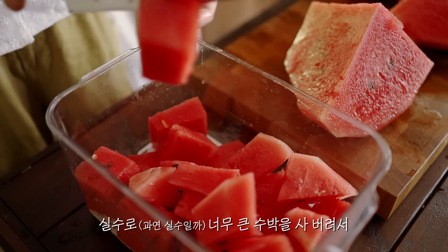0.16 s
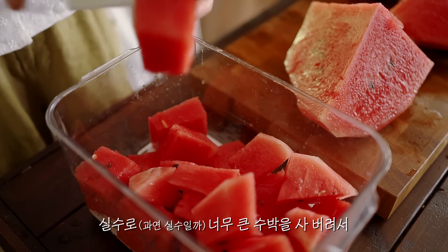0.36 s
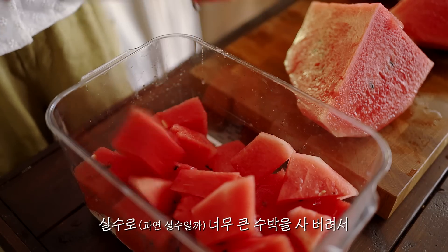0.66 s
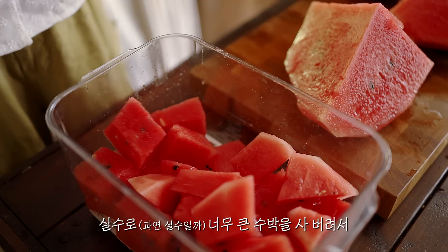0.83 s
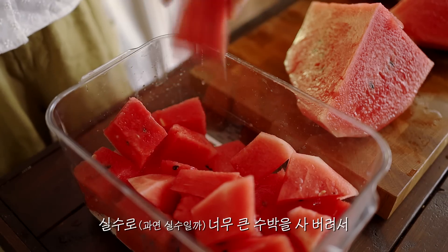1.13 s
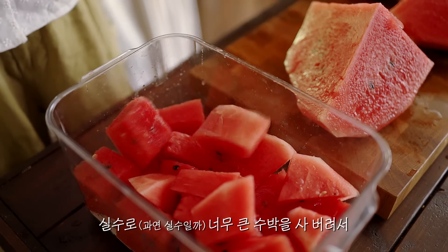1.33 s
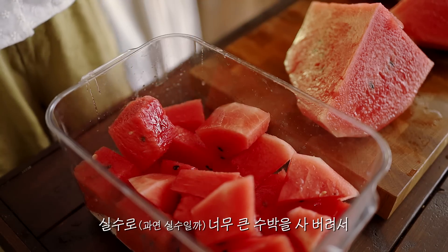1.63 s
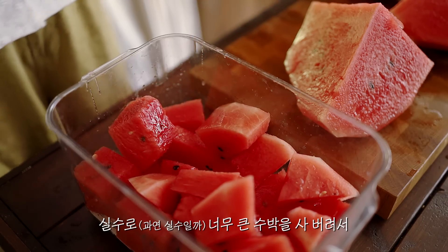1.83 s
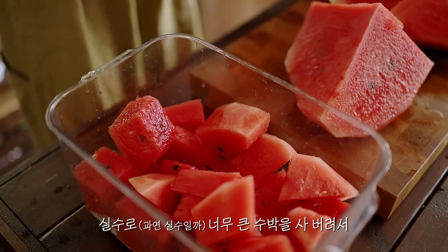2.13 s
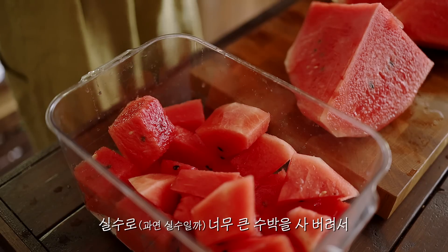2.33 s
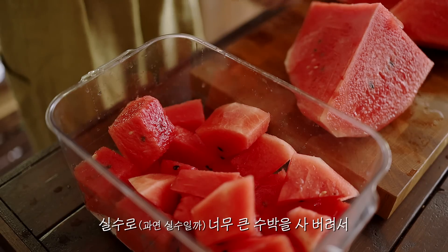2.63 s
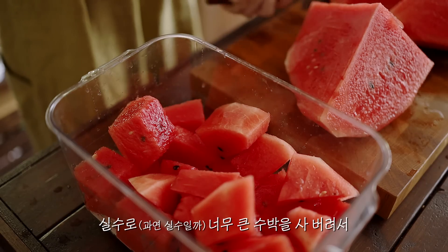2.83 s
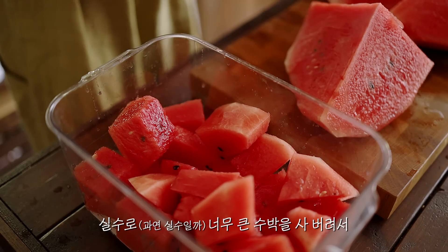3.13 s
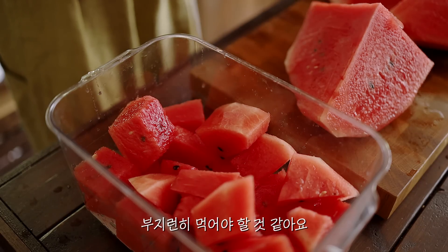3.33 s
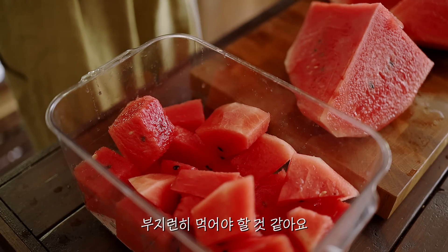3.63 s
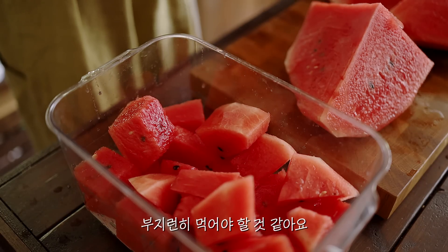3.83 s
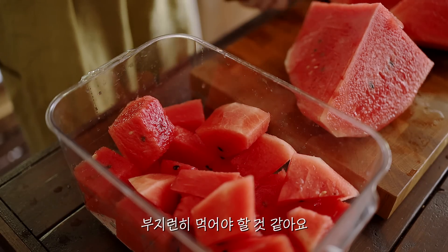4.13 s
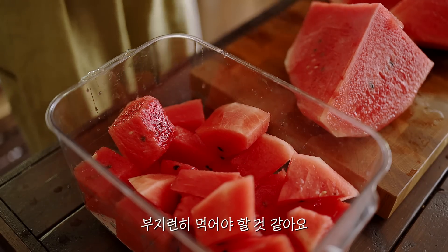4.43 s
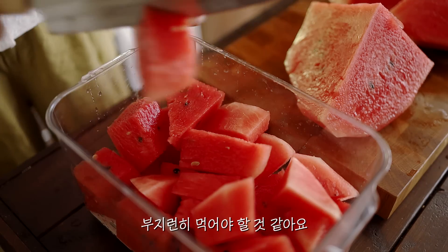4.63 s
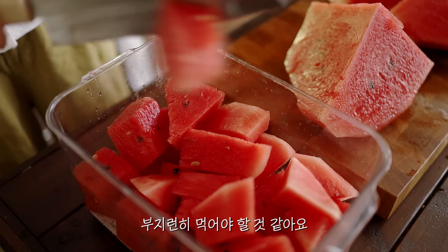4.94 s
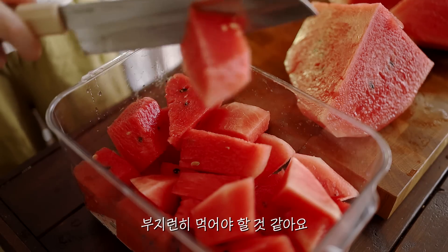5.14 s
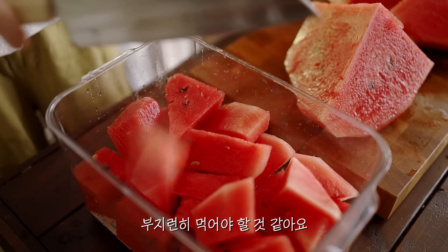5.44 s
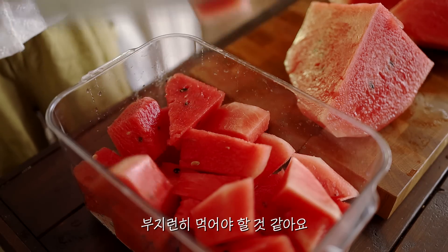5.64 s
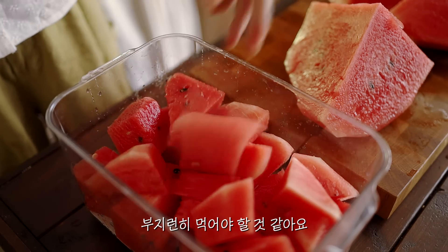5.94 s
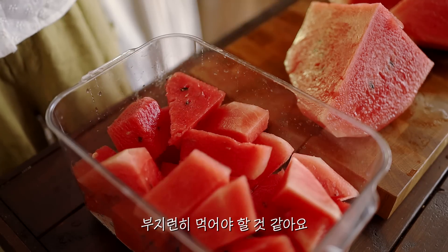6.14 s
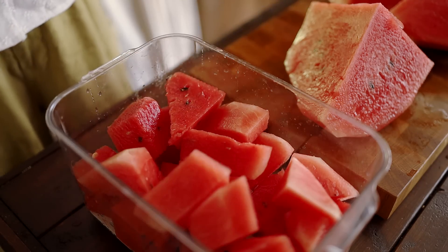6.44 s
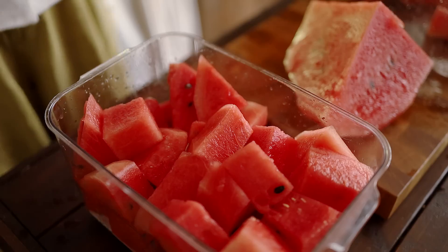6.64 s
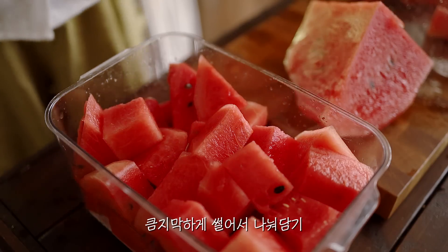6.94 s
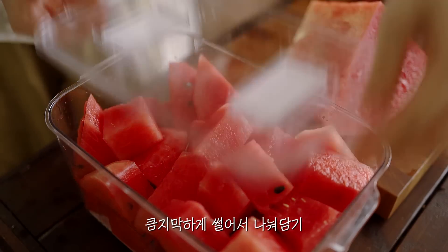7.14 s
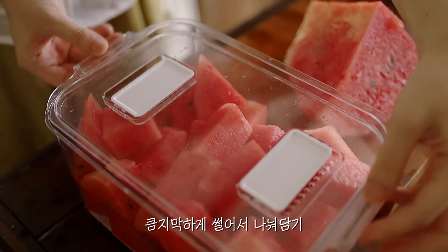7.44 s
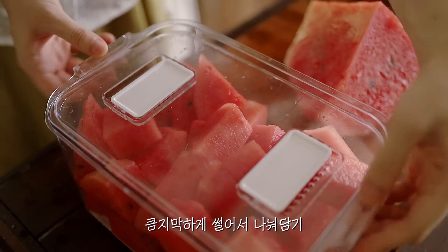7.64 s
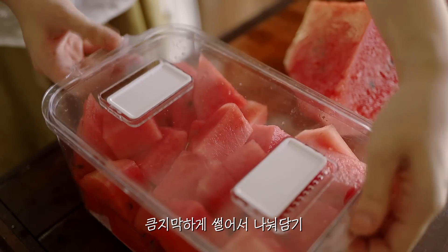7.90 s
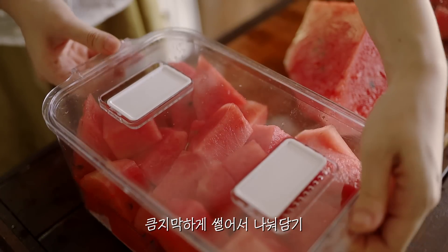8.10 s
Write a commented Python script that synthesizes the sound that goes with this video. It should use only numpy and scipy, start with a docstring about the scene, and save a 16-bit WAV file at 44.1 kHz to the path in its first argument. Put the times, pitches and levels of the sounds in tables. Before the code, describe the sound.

A knife crunches through juicy watermelon and knocks on a wooden board, pieces drop wetly into a plastic tub, then its lid snaps shut.

```python
"""Cutting watermelon in a quiet kitchen.

The blade crunches through wet flesh, bursting cells, and knocks on a wooden board; light touches
ring the steel. Pieces drop wetly into a plastic tub, whose lid is then laid on and snapped shut.
Jolts shake the table. The room hums and reverberates."""
import sys
import numpy as np
from scipy import signal
from scipy.fft import rfft, irfft, next_fast_len
from scipy.io import wavfile
from scipy.ndimage import map_coordinates

SR = 44100
rng = np.random.default_rng(int(sys.argv[2]) if len(sys.argv) > 2 else 0)


def persist_wave(psi):
    """Save psi, clipped to +-1, as 16-bit WAV."""
    counts = np.round(np.clip(psi, -1, 1) * 32767).astype(np.int16)
    wavfile.write(sys.argv[1], SR, np.atleast_2d(counts).T)


N = 364695

# blade in the flesh: start_s, push_s, entry_db, exit_db, swell_db_per_s, fade_db_per_s,
# crunch_re_fizz_db, slit_open_fraction, sizzle_re_fizz_db
STROKES = [(0.42, 0.079, -45, -37.5, 450, 900, -1.5, 0.9, -6), (0.52, .01, -53, -53, 900, 250, -4, 0.9, -8),
           (1.9, 0.074, -60.5, -63.5, 158, 150, 5, 0, -20), (2.259, 0.13, -47.5, -41, 294, 50, 7, 0.48, -9),
           (2.42, 0.065, -39, -33.5, 300, 402, 0.5, 0.97, -18),
           (2.635, .01, -56, -75, 400, 403, -5, .15, -2), (2.7, 0.0068, -53.5, -51, 502, 92, 3.5, 0.6, -12),
           (2.93, .04, -64, -61.5, 300, 603, 7, 0.35, -12), (3.575, .01, -59.5, -63, 600, 300, 7, .2, -5),
           (3.7, 0.097, -65, -59.5, 200, 150, -5, .05, -6),
           (3.925, 0.038, -41.5, -42, 600, 18, -1.5, .5, -10.5),
           (4.015, 0.022, -44.5, -37, 250, 113, 3, 0.94, -13.5),
           (4.406, .005, -52, -52.5, 2000, 280, 3, 0, -10),
           (4.502, 0.086, -52, -55.5, 3000, 78, -6.5, 0.3, -2.5),
           (4.81, 0.039, -46, -37.5, 450, 397, -8, .9, -5), (5.15, .005, -58, -63, 600, 600, -13, .05, -6),
           (5.33, 0.02, -42.5, -37.5, 335, 600, -11, 0.8, -2),
           (5.392, 0.0091, -59, -58, 300, 300, 2, .2, -5), (5.694, .005, -58, -57, 300, 300, 9, .2, -10),
           (5.786, 0.028, -60, -59.5, 700, 232, 9, 0.2, -16), (7.03, 0.1, -70.5, -68, 200, 250, 3, .15, -9)]
# bursting cells: freq_hz, density_db
FIZZ_SPECTRUM = [(1470, -44), (2500, 0), (3270, 0.5), (4930, 2.5), (7610, -3), (10800, -14), (15400, -20),
                 (16500, -36)]
# crunch, one list for slit closed, one for open: freq_hz, density_db
CRUNCH_SPECTRA = [
    [(500, -35), (1000, -6.5), (1600, -1.5), (2300, -5), (3300, -14), (7000, -47)],
    [(900, -42.5), (1700, -8), (2400, -6), (3000, -4.5), (4200, -15.5), (8000, -38)],
]
# juice sheared along the steel: freq_hz, density_db
SIZZLE_SPECTRUM = [(5000, -40), (9000, -4), (12500, -2), (15500, -6), (16500, -30)]
# blade on board, with bounces: start_s, level_db, pan_db, ring_re_blow_db, ring_t60_s, tilt_db_per_oct
KNOCKS = [(2.4594, 9.5, -7.5, -29, 0.47, 12.5), (2.466, -5, -7.5, -15, 0.054, 8),
          (2.4706, -2, -3, -25, 0.09, 12), (2.775, -0.5, -2, -7.5, 0.1, -1.5),
          (4.137, 6, 3, -19, 0.32, -0.5)]
# wooden board: freq_hz, width_hz, gain_db
BOARD_MODES = [(150, 79, -9), (400, 620, -5), (1370, 280, 7.5), (1848, 626, 10), (2170, 396, 12),
               (2840, 230, 4.5), (5800, 3100, -11.5), (10000, 6000, -29)]
# after-ring of board and fruit, applied twice: freq_hz, width_hz, gain_db
RING_MODES = [(342, 130, -3.5), (608, 100, -7.5), (837, 140, -1.5), (1230, 270, 3.5), (1534, 75, 2.5),
              (1903, 200, 4), (2035, 110, 6), (2250, 260, 1.5), (2990, 470, -5.5), (3380, 190, -3),
              (5060, 1800, -18.5)]
# pieces landing on pieces: start_s, level_db, thud_re_splash_db, splash_t60_s,
# splash_tilt_db_per_oct, thud_tilt_db_per_oct, rise_s
DROPS = [(0.6381, -17.5, -7.5, 0.035, -1, 1, 0.004), (.648, -26, -5.5, 0.054, -10.5, 1, 0.0017),
         (0.7225, -29, -10, 0.045, -2, 2.5, 0.0042), (0.7932, -30, 1.5, 0.053, -1, -11, 0.003),
         (1.283, -13, -9, 0.072, -1.5, -2.5, 0.0049), (5.5097, -16.5, -7, 0.027, -3.5, 3, .0019),
         (5.5259, -20.5, 8, 0.11, -6, -1, .0015), (5.541, -29.5, 14.5, .07, -15, -2.5, 0.0042),
         (5.9624, -26.5, -9, .11, 4.5, 5.5, 0.0067), (5.987, -27.5, 3.5, .04, -2, -5, 0.0012),
         (6.0476, -22.5, -23, 0.038, 1.5, 4.5, .003)]
# tub hollow above the heap: freq_hz, width_hz, gain_db
TUB_MODES = [(1065, 400, 6.5), (2165, 920, 5), (3610, 1500, 4.5), (8640, 18000, -6)]
# heap of fruit: freq_hz, width_hz, gain_db
PULP_MODES = [(182.5, 310, -4.5), (340, 310, 2.5), (678, 144, 2), (1037, 164, -11.5)]
# lid meeting rim: start_s, level_db, t60_s, tilt_db_per_oct, rise_s, boom_re_rattle_db
SNAPS = [(7.383, -27, .03, -8.5, .0005, -8.5), (7.403, -8.5, 0.04, 1.5, 0.00025, -6),
         (7.424, -12, 0.037, -8, 0.00064, -6.5), (7.434, -2.5, 0.018, -2.5, 0.00054, -9),
         (7.548, -39, 0.028, -4, 0.00059, 7), (7.587, -35, 0.02, -9, 0.00019, 3),
         (7.614, -47, 0.018, -8, 0.00057, 4), (7.644, -39.5, 0.092, -1, 0.0043, -1.5),
         (7.731, -38.5, 0.03, -23, 0.0054, 5.5), (7.8, -21, 0.018, -12, 0.00083, -9),
         (7.871, -39, .1, -8, 0.029, 2), (7.905, -0.5, 0.038, -0.5, 0.000087, -12),
         (8.159, -41.5, 0.081, -2.5, 0.018, -1), (8.215, -13.5, 0.045, -2, 0.00018, -3),
         (8.242, -5.5, 0.038, -5, 0.0012, -8)]
# plastic lid: freq_hz, width_hz, gain_db
LID_MODES = [(689, 33, -3), (931, 58, -0.5), (1190, 240, -9), (1643, 214, -2.5), (2210, 166, -4),
             (2810, 300, -6.5), (4100, 1400, -10.5), (8300, 5800, -14.5)]
# air under the lid: freq_hz, width_hz, gain_db
BOOM_MODES = [(360, 73, 0)]
# wet ticks: start_s, level_db, pitch_hz
TICKS = [(0.4707, -12.5, 11100), (1.2538, -36, 2660), (1.2985, -15, 5940), (1.411, -39, 5500),
         (1.4646, -40, 4000), (2.381, -17.5, 2740), (3.019, -38, 9000), (3.65, -44, 4500),
         (4.2852, -34, 4440), (4.407, -39, 5800), (4.654, -47.5, 13050), (4.9057, -35, 5000),
         (5.3002, -30.5, 3950), (5.5372, -16.5, 5450), (5.598, -36, 5100), (5.6936, -43.5, 11050),
         (5.9959, -16, 6360), (6.11, -14, 4700)]
# touches on the blade: start_s, level_db, damping_factor (1 = free), centre_hz, spread_oct
TOUCHES = [(3.2236, -31, 2.2, 8350, 1.8), (3.2575, -30, 2.3, 9000, 1.5), (3.5703, -48.5, 0.88, 5570, 0.21),
           (3.70, -50, 0.82, 8000, .9), (3.74, -50.5, .7, 5200, .5), (3.78, -50.5, 0.66, 6300, 0.55),
           (3.82, -51, .8, 5400, .8), (4.5054, -34, 1.6, 4760, 0.077), (4.64, -50, 1, 3700, .07)]
# steel blade: freq_hz, level_db, t60_s
BLADE_MODES = [(3700, -8, .15), (4100, -4, .08), (4880, -4, .12), (5400, -3, .12), (6300, -1, .15),
               (7400, -5, .08), (9500, 0, .2), (10700, -6, .08), (11800, -3, .12), (12600, -4, .1),
               (14000, -8, .08)]
# jolts to the table: start_s, level_db
JOLTS = [(0.65, -36.5), (0.7, -47), (0.8, -45), (1.285, -33), (2.46, -38), (2.775, -29.5), (3.09, -41),
         (4.136, -31.5), (4.41, -42), (5.53, -33), (5.98, -45.5), (7.41, -49)]
# table, applied twice: freq_hz, width_hz, gain_db
TABLE_MODES = [(100, 37, 0.5), (162, 87, 2)]
# room air over time: time_s, level_db
AIR_LEVELS = [(0.0, -45.5), (3.0, -45), (6.5, -45.5), (6.65, -48), (7.5, -48), (7.82, -45), (8.27, -49.5)]
# room air colour: freq_hz, density_db
AIR_SPECTRUM = [(22, -32.5), (42, -6), (60, -6), (80, -24), (105, -7), (166, -7.5), (250, -10), (310, -10),
                (375, -4), (450, -12.5), (594, -14), (1050, -17), (1570, -21.5), (2370, -27), (6000, -39),
                (15200, -49), (16500, -63.5)]
# room air, left to right: freq_hz, correlation
AIR_CORRELATION = [(60, 0.99), (180, 0.97), (550, 0.92), (1650, 0.3), (4970, -0.0), (15000, 0)]
# low drone: pitch_hz, level_db
DRONE = (58, -62)
# kitchen reverb decay: freq_hz, t60_s
REVERB_DECAY = [(150, 0.5), (400, 0.21), (1200, 0.27), (2800, 0.21), (6000, 0.16), (10000, 0.12),
                (15000, 0.048)]
# kitchen reverb, left to right: freq_hz, correlation
REVERB_CORRELATION = [(200, 0.98), (600, 0.93), (1500, 0.58), (4000, 0.011), (14000, 0.81)]

EDGE_TICK_DB, THUD_T60_S = -27.5, .11
JOLT_RISE_S, JOLT_T60_S, LEAN_RE_CRUNCH_DB = 0.0051, .35, -7
LOW_CUT_HZ, TOP_HZ = 100, 16600
SCENE_TIME_S, HIT_TIME_S = np.arange(N) / SR, np.arange(SR // 4) / SR


def slicing():
    """Cells burst along the edge: dense fizz, deeper crunch where the blade is buried, juice sizzle."""
    size_db = 2.9 * np.minimum(rng.exponential(size=N), 6.5)
    cells = amp(size_db + 1.46 * wobble(60) + 0.84 * wobble(300))  # uneven sizes, in clumps
    fizz = stereo_noise(FIZZ_SPECTRUM, [(3000, 0.46), (10000, 0.26)], cells)
    closed, opened = (stereo_noise(spectrum, [(2000, 0.59)], cells) for spectrum in CRUNCH_SPECTRA)
    sizzle = stereo_noise(SIZZLE_SPECTRUM, [(10000, 0.18)], cells)
    mix = sum(gain * layer for gain, layer in zip(stroke_gains(), (fizz, closed, opened, sizzle)))
    return amp([[-.8], [.8]]) * mix


def stroke_gains():
    """Fizz, closed crunch, open crunch and sizzle gains: swell, push, fade; a knock ends the stroke."""
    gains = np.zeros((4, N))
    for start_s, push_s, entry_db, exit_db, swell, fade, crunch_db, opening, sizzle_db in STROKES:
        stop_s = min([knock[0] for knock in KNOCKS if knock[0] > start_s] + [start_s + 1])
        span = slice(round(start_s * SR) - SR // 5, round(stop_s * SR))
        t = SCENE_TIME_S[span] - start_s
        level_db = np.interp(t, [0, push_s], [entry_db, exit_db])
        level_db += swell * np.minimum(t, 0) - fade * np.maximum(t - push_s, 0)
        closed, opened = amp(crunch_db) * np.sqrt([1 - opening, opening])
        gains[:, span] += np.outer([1, closed, opened, amp(sizzle_db)], amp(level_db))
    return gains


def board_knocks(out):
    """Sub-millisecond blow with a bright edge tick; board and fruit ring on in narrower modes."""
    pulse = HIT_TIME_S * np.exp(-HIT_TIME_S / .00005)
    blow = unit_peak(filtered(pulse, body(BOARD_MODES)))
    for start_s, level_db, pan_db, ring_db, t60_s, tilt in KNOCKS:
        ring = unit_peak(filtered(burst(t60_s, 0.0004, tilt), lambda hz: body(RING_MODES)(hz) ** 2))
        tick = unit_peak(burst(t60_s=0.0025, rise_s=0.00013, tilt_db_per_oct=4))
        knock = blow + amp(ring_db) * ring + amp(EDGE_TICK_DB) * tick
        place(out, start_s, amp(level_db) * knock, wet_db=-10, pan_db=pan_db)


def falling_pieces(out):
    """Wet splash in the hollow of the tub, soft thud of the heap."""
    for start_s, level_db, thud_db, t60_s, splash_tilt, thud_tilt, rise_s in DROPS:
        spray = burst(t60_s, rise_s, splash_tilt)
        splash = filtered(spray, lambda hz: body(TUB_MODES)(hz) * highpass(hz, 700))
        thud = filtered(burst(THUD_T60_S, rise_s, thud_tilt), body(PULP_MODES))
        landing = unit_peak(splash) + amp(thud_db) * unit_peak(thud)
        place(out, start_s, amp(level_db) * landing, wet_db=-7.5)


def lid_snaps(out):
    """Each contact rattles the plastic's resonances and pumps the air beneath."""
    for start_s, level_db, t60_s, tilt, rise_s, boom_db in SNAPS:
        contact = burst(t60_s, rise_s, tilt)
        rattle = filtered(contact, lambda hz: body(LID_MODES)(hz) / (1 + 1j * hz / 7000) ** 2)
        boom = filtered(burst(t60_s, rise_s), body(BOOM_MODES))
        snap = unit_peak(rattle) + amp(boom_db) * unit_peak(boom)
        place(out, start_s, amp(level_db) * snap, wet_db=-8, pan_db=-.8)


def wet_ticks(out):
    """Short noise bursts, each through one broad resonance."""
    for start_s, level_db, pitch_hz in TICKS:
        tick = filtered(burst(t60_s=.008, rise_s=.0003), body([(pitch_hz, .4 * pitch_hz, 0)]))
        place(out, start_s, amp(level_db) * unit_peak(tick), wet_db=-13)


def blade_touches(out):
    """Light touches ring the steel, each favouring the modes near one pitch."""
    t = HIT_TIME_S
    for start_s, level_db, damping, centre_hz, spread_oct in TOUCHES:
        ring = np.zeros_like(t)
        for hz, mode_db, t60_s in BLADE_MODES:
            onset_db = mode_db - 3.3 * (np.log2(hz / centre_hz) / spread_oct) ** 2 + rng.normal(0, 2)
            ring += amp(onset_db - 60 * damping * t / t60_s) * np.sin(2 * np.pi * hz * t)
        attack = 1 - np.exp(-t / 0.00033)
        touch = unit_peak(ring) * attack + .3 * burst(t60_s=.03, rise_s=0.00063)
        place(out, start_s, amp(level_db) * touch, wet_db=-9)


def table_shudder():
    """The table shakes after each jolt and while the buried blade leans on it."""
    t = np.arange(SR // 2) / SR
    closed_crunch_gain = stroke_gains()[1]
    gain = np.pad(amp(LEAN_RE_CRUNCH_DB) * closed_crunch_gain, (0, len(t)))
    attack = 1 - np.exp(-t / JOLT_RISE_S)
    for start_s, level_db in JOLTS:
        gain[round(start_s * SR):][:len(t)] += amp(level_db - 60 * t / JOLT_T60_S) * attack
    rumble = filtered(rng.standard_normal(N), lambda hz: body(TABLE_MODES)(hz) ** 2)
    return gain[:N] * unit_rms(rumble)


def room_hum():
    """Distant air, drifting a little, and a low wavering drone."""
    air_db = np.interp(SCENE_TIME_S, *np.transpose(AIR_LEVELS)) + 0.16 * wobble(2.9) + 1.2 * wobble(13)
    drone_hz, drone_db = DRONE
    drone_gain = amp(drone_db + 1.4 * wobble(10))
    drone = drone_gain * np.sin(2 * np.pi * drone_hz * SCENE_TIME_S + 0.66 * wobble(1.7))
    return amp(air_db) * stereo_noise(AIR_SPECTRUM, AIR_CORRELATION) + drone


def place(out, start_s, hit, wet_db, pan_db=1.5):
    """Adds a hit and its kitchen reverb, with decay time by frequency. Positive pan is left."""
    hz, t, noise = signal.stft(rng.standard_normal((2, SR // 3)), SR, nperseg=256)
    correlation = np.clip(log_interp(REVERB_CORRELATION, hz), 0, 1)[:, None]
    noise[1] = correlation * noise[0] + np.sqrt(1 - correlation ** 2) * noise[1]
    decay = amp(-60 * t / log_interp(REVERB_DECAY, hz)[:, None])
    tail = signal.istft(noise * decay, SR, nperseg=256)[1]
    tail /= np.linalg.norm(tail[0])
    predelayed = np.pad(hit, (130, 0))
    heard = amp(wet_db) * signal.fftconvolve(predelayed[None], tail, axes=1)
    heard[0, 2:len(hit) + 2] += hit * amp(pan_db / 2)  # left lags 2 samples
    heard[1, :len(hit)] += hit * amp(-pan_db / 2)
    out[:, round(start_s * SR):][:, :heard.shape[1]] += heard


def burst(t60_s, rise_s, tilt_db_per_oct=0):
    """Noise that swells and dies, tilted about 2 kHz."""
    t = HIT_TIME_S
    white = rng.standard_normal(len(t))
    noise = filtered(white, lambda hz: amp(tilt_db_per_oct * np.log2((hz + 300) / 2000)))
    return noise * amp(-60 * t / max(t60_s, .001)) * (1 - np.exp(-t / rise_s)) ** 2


def stereo_noise(spectrum, correlation, envelope=1):
    """Coloured noise at rms 1; left-right correlation from (freq_hz, correlation) points."""
    def mid_side_response(hz):
        angle = np.arccos(np.clip(log_interp(correlation, hz), -1, 1)) / 2
        return amp(log_interp(spectrum, hz)) * [np.cos(angle), np.sin(angle)]
    mid, side = filtered(envelope * rng.standard_normal((2, N)), mid_side_response)
    return unit_rms(np.array([mid + side, mid - side]))


def body(modes):
    """Causal response of band-pass resonances, alternating in sign."""
    return lambda hz: sum(
        (-1) ** k * amp(db) * 1j * hz * width_hz / (mode_hz ** 2 - hz ** 2 + 1j * hz * width_hz)
        for k, (mode_hz, width_hz, db) in enumerate(modes))


def filtered(x, response):
    """Applies a complex frequency response."""
    n = x.shape[-1]
    n_fft = next_fast_len(n + SR // 10, real=True)
    return irfft(rfft(x, n_fft) * response(np.fft.rfftfreq(n_fft, 1 / SR)), n_fft)[..., :n]


def wobble(rate_hz):
    """Smooth random curve."""
    knots = rng.standard_normal(int(N * rate_hz / SR) + 4)
    return map_coordinates(knots, [SCENE_TIME_S * rate_hz])


def log_interp(points, hz):
    freq_hz, values = np.transpose(points)
    return np.interp(np.log(hz + 1), np.log(freq_hz + 1), values)


def highpass(hz, corner_hz):
    return 1j * hz / (1j * hz + corner_hz)


def amp(db):
    return 10 ** (np.asarray(db) / 20)


def unit_rms(x):
    return x / np.sqrt(np.mean(x ** 2) + 1e-20)


def unit_peak(x):
    return x / np.max(np.abs(x))


def scene():
    """Hits, with no deep bass through the air, over slicing, table and room."""
    hits = np.zeros((2, N + SR))
    for source in (board_knocks, falling_pieces, lid_snaps, wet_ticks, blade_touches):
        source(hits)
    airborne = filtered(hits[:, :N], lambda hz: highpass(hz, 90) ** 2)
    return airborne + slicing() + table_shudder() + room_hum()


def record(dry):
    """Soft clip on the loudest blows, bass roll-off, band limit."""
    clipped = dry / (1 + np.abs(dry) ** 8) ** (1 / 8)
    return filtered(clipped, lambda hz: (hz < TOP_HZ) * highpass(hz, LOW_CUT_HZ))


dry = scene()
out = record(dry)
persist_wave(out)
```